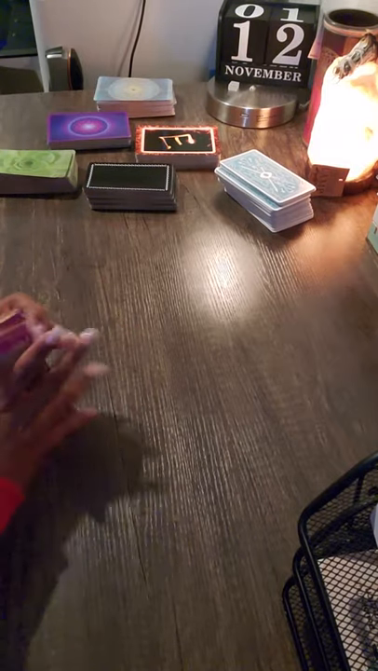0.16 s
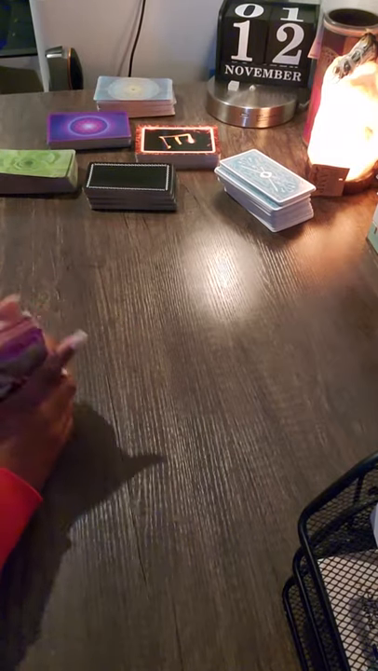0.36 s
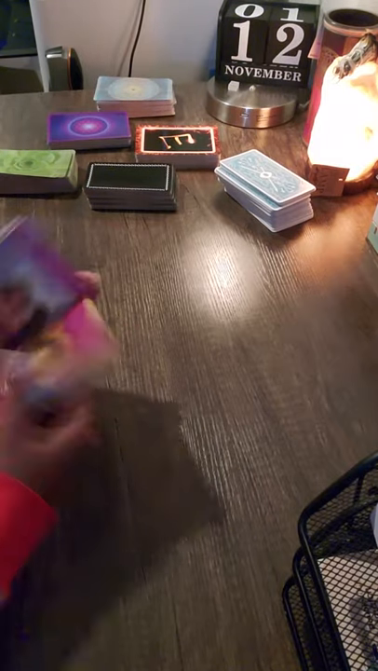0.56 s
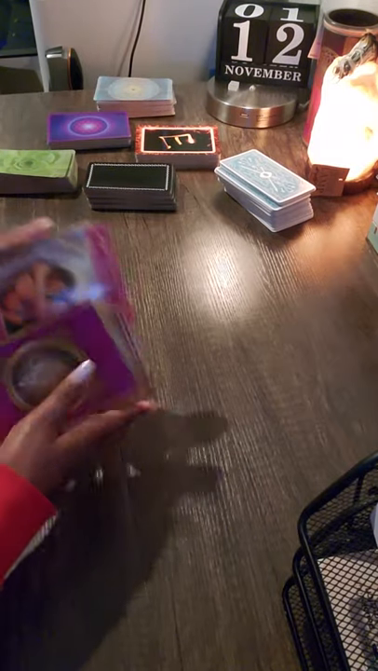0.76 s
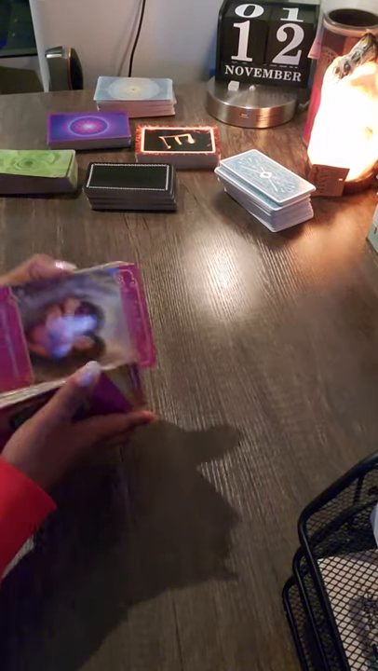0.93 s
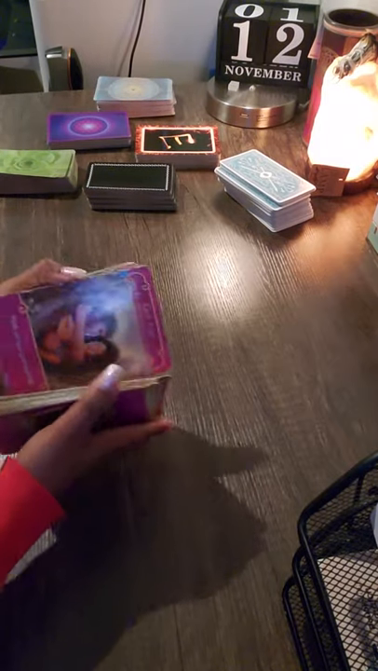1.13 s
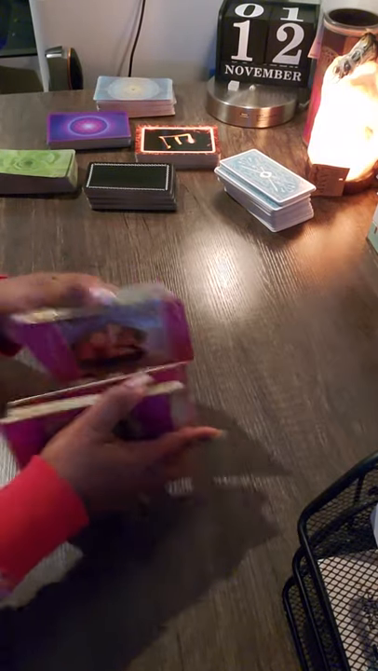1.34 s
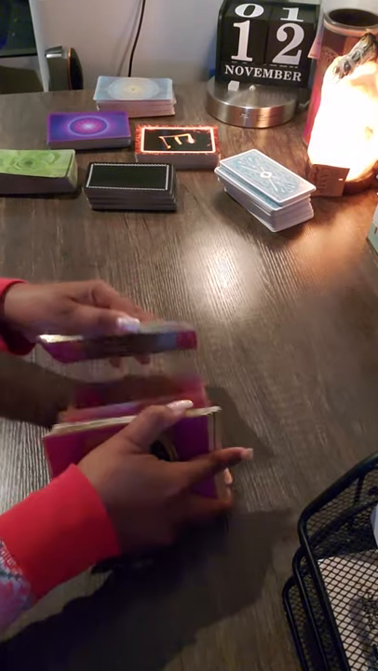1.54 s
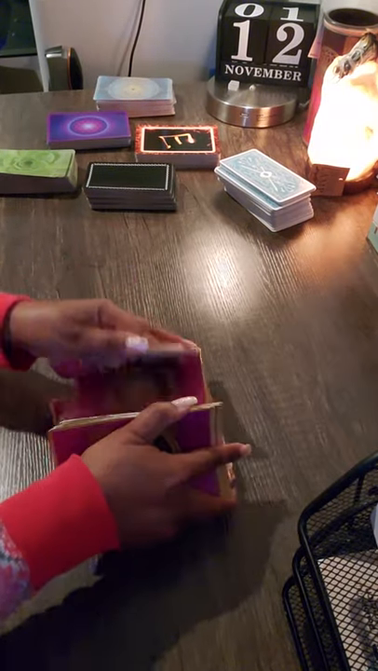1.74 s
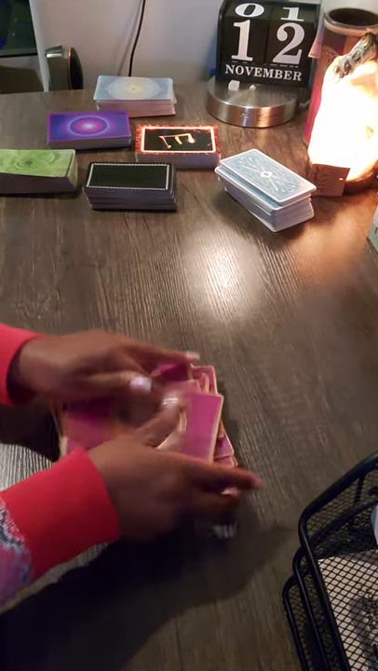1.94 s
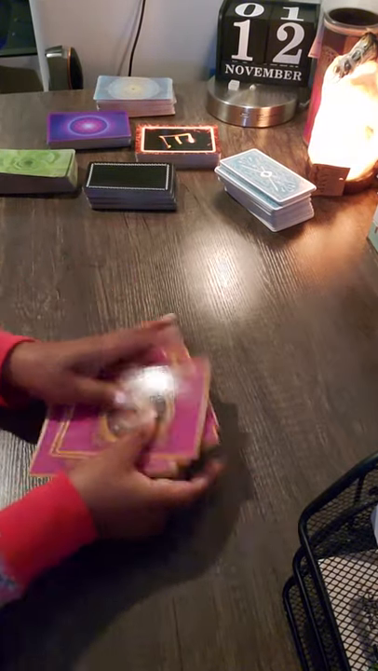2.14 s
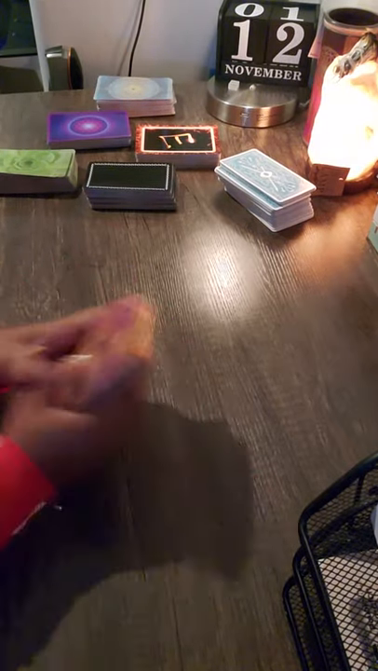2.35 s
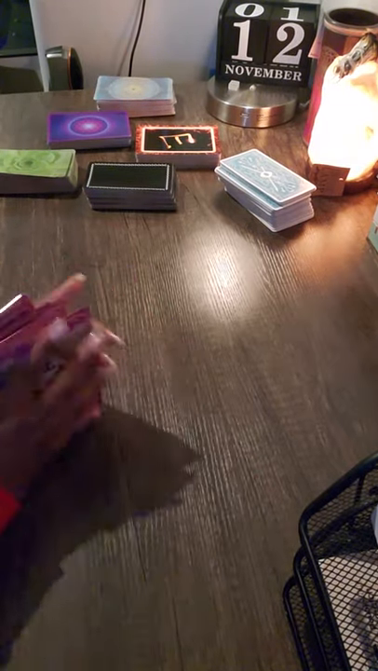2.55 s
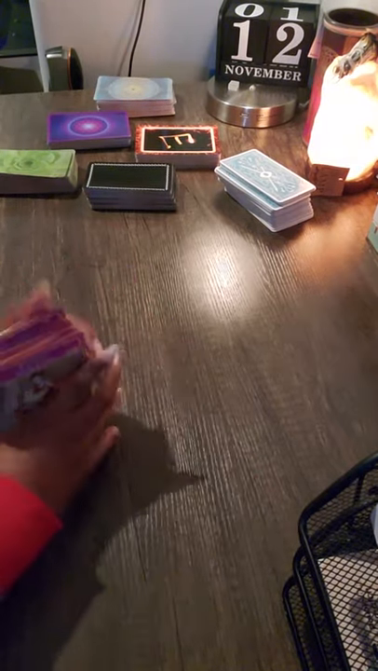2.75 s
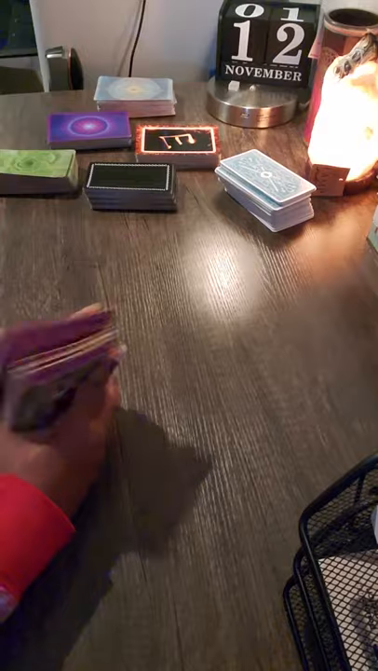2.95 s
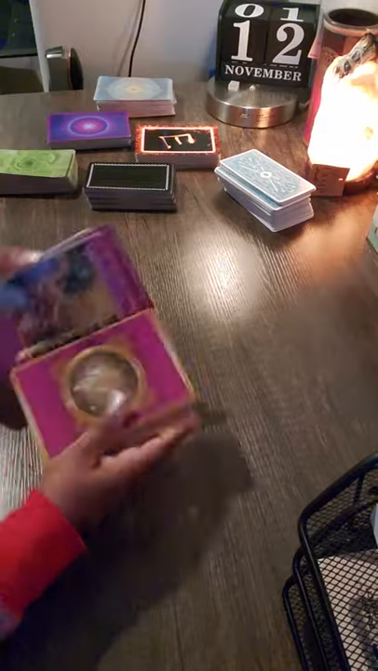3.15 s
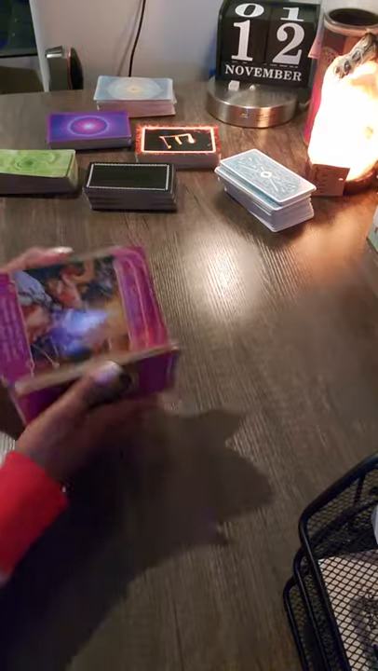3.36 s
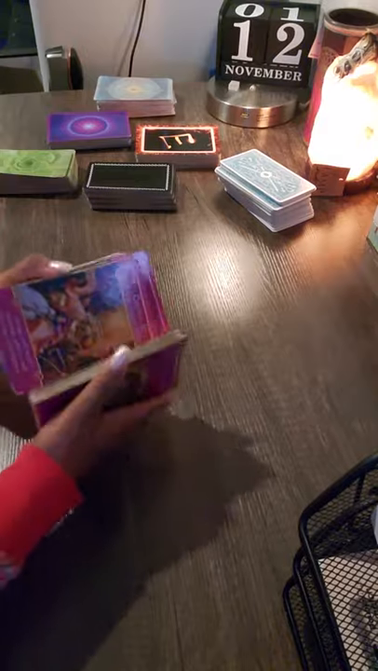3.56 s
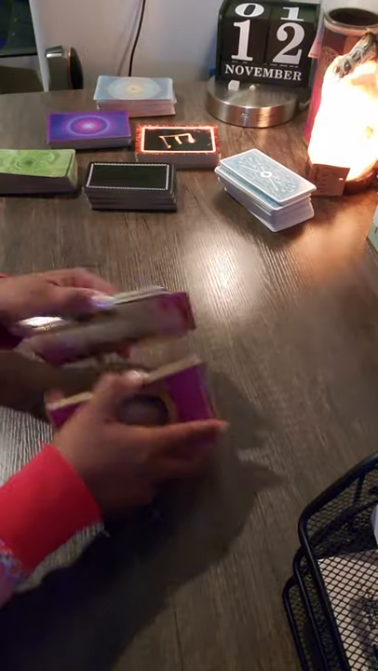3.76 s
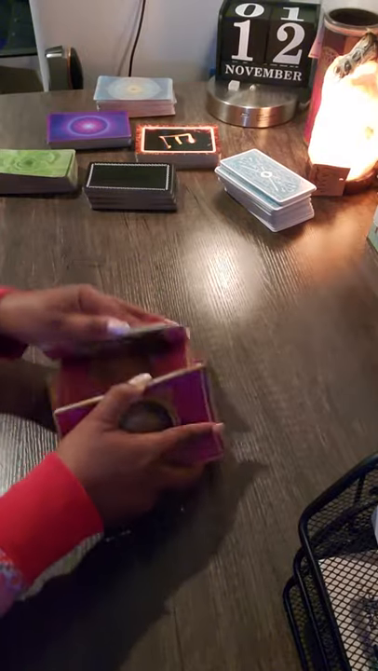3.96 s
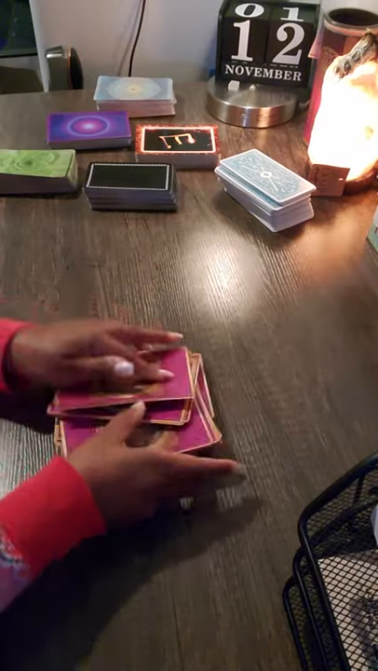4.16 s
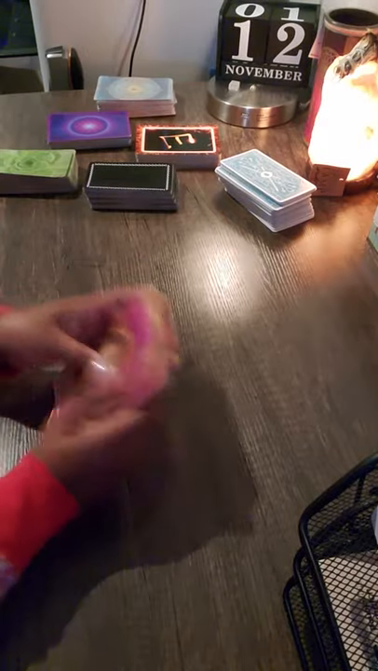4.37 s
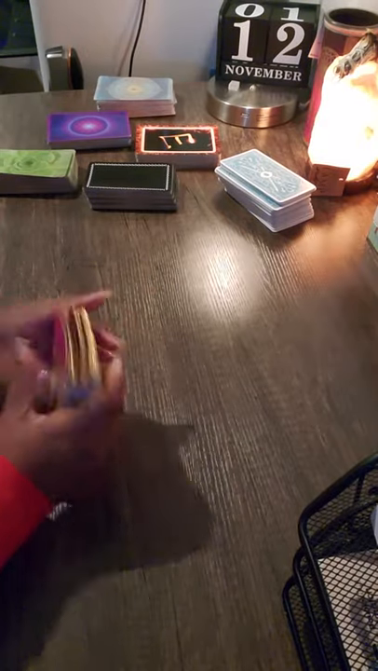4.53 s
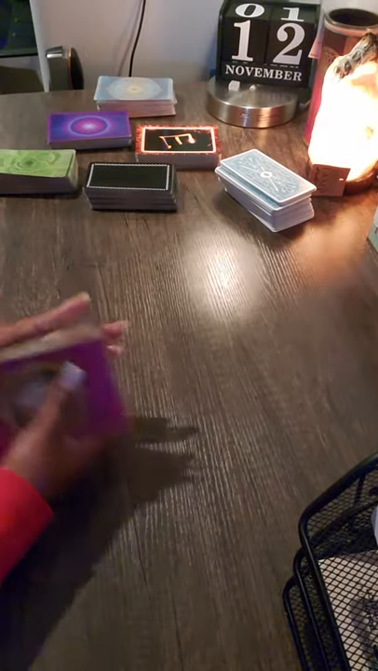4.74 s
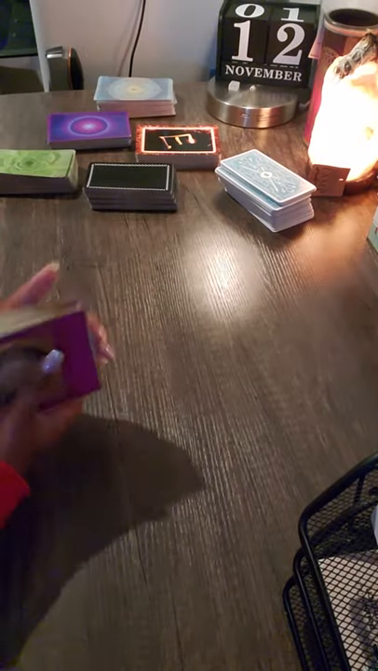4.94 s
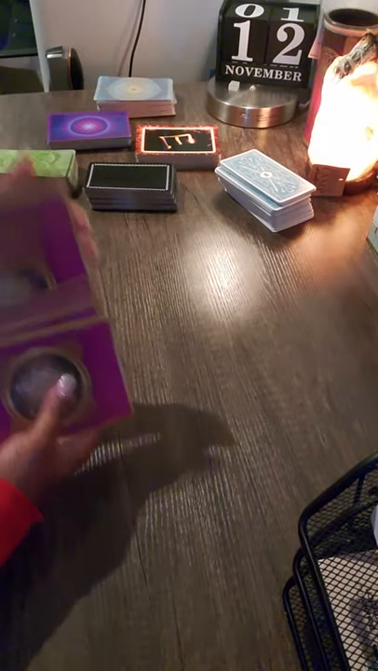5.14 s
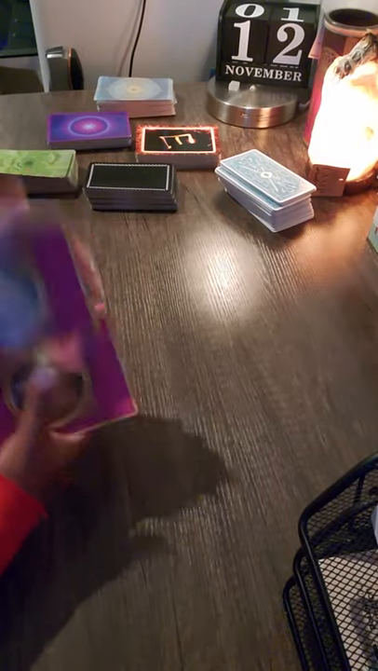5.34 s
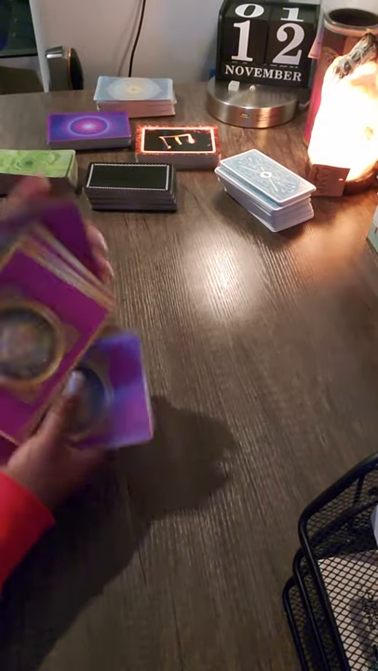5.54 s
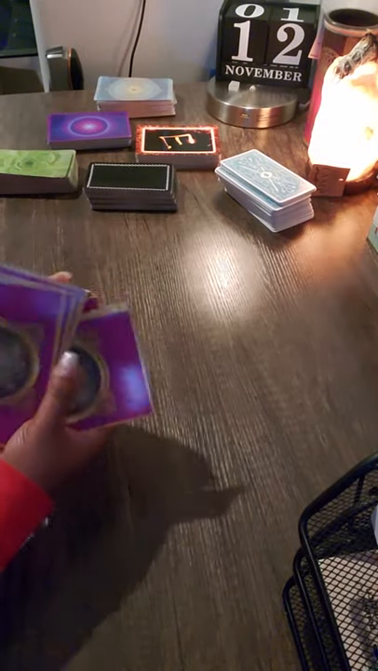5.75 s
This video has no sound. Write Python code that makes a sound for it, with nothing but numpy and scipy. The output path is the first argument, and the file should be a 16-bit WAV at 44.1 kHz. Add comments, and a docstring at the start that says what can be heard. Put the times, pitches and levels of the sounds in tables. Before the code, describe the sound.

Hands shuffle thick cards in a quiet room: dense papery slaps and low table knocks come in clusters, separated by soft flicks and lulls.

```python
"""Hands shuffle a deck of large stiff cards over a wooden table in a quiet furnished room; two close phone mics.
0-0.8 s: quick slaps, sliding, then light flicks; a lull of low rumble, hum and faint hiss (filtered noise, sine).
1.5-2.9 s: dense slaps (noise bursts through deck resonances), table thuds (dying sines), card rub (gated noise).
2.9-3.8 s: soft flicks and a brief rasp (slips through a gliding resonance); 3.9-4.7 s: slaps and thuds again.
4.7-5.8 s: faint rasps, then sliding, louder rasps and the last hard slaps."""
import sys
import numpy as np
from scipy import signal
from scipy.io import wavfile
from scipy.ndimage import uniform_filter1d

SR = 44100
rng = np.random.default_rng(int(sys.argv[2]) if len(sys.argv) > 2 else 0)


def attenuation_scalar(level_db):
    """Turn a level in dB into a linear amplitude multiplier (20 dB per decade)."""
    decades = np.asarray(level_db, float) / 20
    return 10 ** decades


def int16_out(signal):
    """Quantize to a 16-bit WAV file."""
    q = np.round(np.clip(np.atleast_2d(signal).T, -1, 1) * 32767)
    wavfile.write(sys.argv[1], SR, q.astype(np.int16))


N = 255780


def evened(x):
    """Scales to unit rms."""
    return x / np.sqrt(np.mean(x ** 2) + 1e-20)


def read(points, hz):
    """Interpolates a table over log frequency."""
    f, value = np.transpose(points)
    return np.interp(np.log(hz + 1), np.log(f + 1), value)


def add(mix, s, sound):
    """Adds a sound into the mix at s seconds, cut at the end."""
    part = mix[..., max(round(s * SR), 0):][..., :sound.shape[-1]]
    part += sound[..., :part.shape[-1]]


def band(x, lo_hz, hi_hz, order=2):
    edges = np.clip([lo_hz, hi_hz], 10, SR / 2 - 500)
    return signal.sosfilt(signal.butter(order, edges, "bandpass", fs=SR, output="sos"), x)


def ring(modes, t, detune):
    """Sum of dying sines; detune shifts each mode's pitch and strength."""
    hz, db, t60_s = np.transpose(modes)[:, :, None]
    shake = detune[:len(hz), None]
    level = attenuation_scalar(db + 4 * shake - 60 * t / t60_s)
    pitch_hz = hz * (1 + 0.06 * shake[::-1])
    return (level * np.sin(2 * np.pi * pitch_hz * t)).sum(0)


# left-right likeness of noise and echo: f/Hz, likeness/1
SAME = [(60, 0.75), (300, 0.85), (1000, 0.14), (3000, 0.2), (7000, 0.0059)]


def pair(size):
    """Spectra of white noise at two mics: alike in the bass, nearly unrelated in the treble."""
    hz = np.fft.rfftfreq(size, 1 / SR)
    a, b, c, d = rng.standard_normal((4 * N // size + 5, len(hz), 4)).T
    same = np.clip(read(SAME, hz), -1, 1)[:, None]
    left = a + 1j * b
    right = same * left + np.sqrt(1 - same ** 2) * (c + 1j * d)
    return hz, np.array([left, right])


def unfold(z, size):
    """Spectra to waveforms of unit rms."""
    return evened(signal.istft(z, nperseg=size, noverlap=3 * size // 4)[1][:, :N])


# hiss spectrum: f/Hz, relative density/dB per Hz
QUIET = [(25, -3.5), (70, -6.5), (100, -10), (242, -26), (1250, -34.5), (11600, -38.5), (16000, -35.5)]
QUIET_RMS_DB = -70.5
# low rumble: t/s, rms level/dB
RUMBLE = [(0, -57.5), (0.901, -75.5), (1.13, -68), (1.4, -75.5), (3.28, -63), (3.5, -76.5), (4.449, -59),
          (5.8, -78)]
HUM_HZ, HUM_PEAK_DB = 120, -76


def room_tone():
    """Steady shaped-noise hiss, narrow-band rumble of wavering level, household hum as a steady sine."""
    t = np.arange(N) / SR
    hz, z = pair(size=2048)
    hiss = attenuation_scalar(QUIET_RMS_DB) * unfold(z * attenuation_scalar(read(QUIET, hz))[:, None], size=2048)
    s, db = np.transpose(RUMBLE)
    hum = attenuation_scalar(HUM_PEAK_DB) * np.sin(2 * np.pi * HUM_HZ * t)
    low = rng.standard_normal(N) + 0.22 * rng.standard_normal((2, N))  # mostly common to both mics
    rumble = attenuation_scalar(np.interp(t, s, db)) * evened(band(low, 66, 80))
    return hiss + rumble + hum


# room decay: f/Hz, t60/s
ROOM = [(150, 0.21), (500, 0.16), (1500, 0.18), (4000, 0.23), (8000, 0.16), (15000, 0.038)]


def room(x):
    """Echo: sparse taps of random sign, each band dying at its own speed."""
    length = SR // 2
    slots = np.arange(120, length - 20, 20)
    taps = np.zeros((2, length))
    at = slots + rng.integers(0, 20, (2, len(slots)))
    np.put_along_axis(taps, at, rng.choice([-1., 1.], at.shape), 1)
    hz, t, z = signal.stft(taps, SR, nperseg=512)
    same = np.clip(read(SAME, hz), -1, 1)[:, None]
    z[1] = same * z[0] + np.sqrt(1 - same ** 2) * z[1]  # close mics share the bass
    decay = attenuation_scalar(-60 * t / read(ROOM, hz)[:, None])
    tail = signal.istft(z * decay, SR, nperseg=512)[1]
    tail *= 1 - np.exp(-np.arange(tail.shape[1]) / SR / 0.00029)  # echoes build up as the walls answer
    return signal.fftconvolve(x[None], tail / np.linalg.norm(tail[0]), axes=1)[:, :N]


# table-top modes, damped by the hands, nominal: f/Hz, level/dB, t60/s
TABLE = [(82, -9, .04), (120, 0, .065), (190, -11, .022)]
# hands and deck knocking the table: t/s, nominal peak level/dB, mode pitch at that spot/ratio
THUDS = [(0.034, -36.5, 0.75), (0.201, -38.5, 1.14), (0.302, -34, 1.03), (1.545, -36.5, 1),
         (1.623, -28.5, 0.75), (1.701, -36.5, 1.18), (1.718, -29.5, 0.99), (1.796, -33, 0.69),
         (1.914, -35, 0.97), (2.556, -33, 0.92), (2.595, -28, 1.18), (3.885, -26, 1.05), (3.983, -28, 1.01),
         (4.031, -24, 1.15), (4.116, -33, 0.91), (4.143, -38, 1.3), (4.58, -39, 1.11), (4.609, -26, 0.94),
         (5.69, -30, 1.08)]
THUD_SIDE_DB = 0.7  # scale of left-right scatter


def knocks():
    """Table-top modes swell over a few ms and die."""
    t, out = np.arange(round(.12 * SR)) / SR, np.zeros((2, N))
    detunes = rng.standard_normal((len(THUDS), len(TABLE)))
    for (s, db, ratio), detune in zip(THUDS, detunes):
        modes = np.multiply(TABLE, [ratio, 1, 1])
        thud = ring(modes, t, detune / 2) * (1 - np.exp(-t / 0.01))
        side_db = THUD_SIDE_DB * detune[-1] * np.array([[1], [-1]])  # each lands nearer one mic
        add(out, s, attenuation_scalar(db + side_db) * thud / abs(thud).max())
    return out


# edge dragged over a card: start t/s, end t/s, start f/Hz, end f/Hz, level before fades/dB
RASPS = [(.4, .52, 480, 360, -61), (.535, .658, 1650, 1450, -58), (3.05, 3.17, 1580, 1650, -62),
         (4.78, 5.06, 4800, 4700, -69), (5.212, 5.245, 5900, 5100, -62), (5.236, 5.329, 2280, 2500, -69),
         (5.408, 5.48, 1650, 1900, -37), (5.46, 5.585, 2050, 1750, -48)]
RASP_WIDEST_HZ = 750


def rasp():
    """A dragged edge catches in quick random slips, sounding the gap between cards as a gliding resonance."""
    out = np.zeros(N)
    for start, end, from_hz, to_hz, db in RASPS:
        t = np.arange(round((end - start) * SR)) / SR
        slips = rng.standard_normal(len(t)) * (rng.random(len(t)) < .5 * from_hz / SR)
        glide_hz = np.linspace(from_hz, to_hz, len(t))
        turn = np.exp(2j * np.pi * np.cumsum(glide_hz) / SR)
        r = np.exp(-np.pi * min(.3 * from_hz, RASP_WIDEST_HZ) / SR)  # width grows with the start pitch
        # shift down to 0 Hz, smooth twice, shift back
        once = signal.lfilter([1 - r], [1, -r], slips / turn)
        gap = (turn * signal.lfilter([1 - r], [1, -r], once)).real
        add(out, start, attenuation_scalar(db) * evened(gap) * signal.windows.tukey(len(t), .3))
    return out


# sliding strokes, and rattling or echoing tails of slaps:
# start t/s, hold/s, rub level/dB, flexing body level/dB, glossy hiss level/dB
STROKES = [(0, 0.095, -60.5, -56, -58), (0.138, 0.09, -71.5, -52.5, -65.5),
           (0.194, 0.029, -69.5, -49.5, -70.5), (0.292, 0.075, -57.5, -48, -78.5),
           (0.583, .045, -50.5, -64, -47), (0.628, 0.049, -50.5, -74.5, -58),
           (0.751, 0.12, -76, -81, -72.5), (1.62, 0.03, -40, -37.5, -43), (1.72, 0.0381, -69, -57.5, -46),
           (1.778, 0.026, -34.5, -34, -37.5), (1.883, 0.015, -32, -36, -39.5),
           (1.909, 0.037, -36, -27, -35.5), (1.563, .03, -53, -53.5, -52.5),
           (2.091, 0.027, -47.5, -58.5, -72), (2.297, 0.034, -38.5, -60.5, -42.5),
           (2.37, 0.11, -49.5, -56.5, -52.5), (2.566, 0.026, -60.5, -30, -64),
           (2.633, .05, -77, -40.5, -86), (2.753, 0.077, -87.5, -58, -92.5),
           (2.993, 0.19, -61, -74.5, -61.5), (3.266, 0.06, -64, -76.5, -63),
           (3.933, 0.15, -50.5, -46.5, -50.5), (4.116, 0.046, -31.5, -32.5, -32.5),
           (4.2, 0.047, -48, -47, -61), (4.287, 0.063, -55.5, -64.5, -72), (4.402, 0.11, -56.5, -71, -67),
           (4.594, 0.028, -38.5, -34.5, -42), (4.654, 0.033, -47, -44.5, -48.5),
           (5.124, 0.039, -66.5, -68.5, -70), (5.385, 0.03, -40.5, -36.5, -45),
           (5.454, .11, -47.5, -53, -52), (5.641, .12, -50.5, -60, -54)]
RISE_DB_PER_S, FALL_DB_PER_S = 899, 351
FIDGET_DB = -87  # cards never lie quite still in the hands


def strokes():
    """Gains of rub, body and gloss: each stroke or tail rises fast, holds and falls slower; powers add."""
    t = np.arange(0, N + 64, 64) / SR
    start, hold, *levels_db = np.transpose(STROKES)[:, :, None]
    rise_db = -RISE_DB_PER_S * np.maximum(start - t, 0)
    fall_db = -FALL_DB_PER_S * np.maximum(t - start - hold, 0)
    gains = []
    for db in levels_db:
        power = (attenuation_scalar(db + rise_db + fall_db) ** 2).sum(0)
        gains.append(np.sqrt(power + attenuation_scalar(FIDGET_DB) ** 2))
    return [np.interp(np.arange(N) / SR, t, gain) for gain in gains]


# deck modes, nominal, rung by slides and slaps: f/Hz, level/dB, t60/s
DECK = [(618.8, -4.5, 0.04), (1066, -3.5, 0.01), (1920, 10, 0.0032), (3100, 1, 0.011)]
GRIP_DB = 2.8  # rms unevenness of grip


def slide():
    """Glossy faces rub with uneven grip (patchy noise); loose edges tick when the cards move hard."""
    rub, weight, gloss = strokes()
    hz, z = pair(size=256)
    patches = uniform_filter1d(rng.standard_normal(z.shape[1:]), size=5, axis=0)
    patches = evened(uniform_filter1d(patches, size=14, axis=1))
    grip = evened(uniform_filter1d(rng.standard_normal(z.shape[2]), size=6))
    hiss = unfold(z * attenuation_scalar(2.7 * patches + GRIP_DB * grip), size=256)
    # about 150 ticks per s, t60 9 ms
    ticks = attenuation_scalar(4.5 * np.minimum(rng.exponential(1, N), 3)) * (rng.random(N) < 150 / SR)
    ticks = signal.oaconvolve(ticks, attenuation_scalar(-60 * np.arange(900) / SR / 0.009))[:N]
    hard = weight / (weight + attenuation_scalar(-48))  # ticking grows as cards flex; light swishes stay smooth
    drive = hiss * (1 + 0.9 * hard * (evened(ticks) - .7))
    low = band(drive, 160, 1600)
    deck = ring(DECK, np.arange(2048) / SR, np.zeros(len(DECK)))[None]
    flex = signal.oaconvolve(low, deck, axes=1)[:, :N]
    rub_sound = rub * evened(band(drive, 2800, 7800))
    body_sound = weight * evened(evened(low) + 0.045 * evened(flex))
    gloss_sound = gloss * evened(band(drive, 8300, 24000, order=3))
    return rub_sound + body_sound + gloss_sound


def body(push, hz, top_hz, deck, heavy):
    """Broad push, lifted at the hollow's pitch, plus brief deck ring; light flicks sound mostly the hollow."""
    rung = band(signal.fftconvolve(push, deck, axes=1)[:, :push.shape[1]], 300, SR)
    wide = band(push, 250, top_hz, order=6)
    spread = 1.1 + .12 * heavy
    hollow = band(push, hz / spread, hz * spread)
    wide_part = (0.2 + 1.6 * heavy) * evened(wide)
    hollow_part = (1.3 - 0.45 * heavy) * evened(hollow)
    return evened(wide_part + hollow_part + 2.2 * heavy ** 2 * evened(rung))


# slaps: t/s, peak level of body/dB, f of hollow between cards/Hz, edge crack peak re body/dB
SLAPS = [(0.029, -40.5, 584, -53.5), (0.089, -46.5, 2550, 27), (0.111, -29, 990, -46.5),
         (0.122, -29.5, 614, -48), (0.191, -23, 595, -42), (0.229, -20, 1370, -50.5),
         (0.24, -9.5, 3020, -14), (0.308, -25, 630, -34.5), (0.627, -38, 1910, 15), (0.66, -32, 4080, -12),
         (0.684, -46, 660, -14), (0.693, -31.5, 3000, -3.5), (0.718, -36.5, 2900, -7),
         (0.973, -57, 1727, 3), (1.033, -66, 1900, -23), (1.516, -35.5, 1995, -10.5),
         (1.555, -12.5, 740, 2.5), (1.628, -10, 1500, -6), (1.697, -6.5, 1730, -20),
         (1.703, 0.5, 1570, 1.5), (1.733, -21, 2197, -13), (1.777, -20, 970, -20), (1.794, -14.5, 1760, -9),
         (1.806, -12.5, 940, -6), (1.825, -17.5, 600, -6), (1.869, -15, 4330, -0.5),
         (1.884, -13.5, 482, -12), (1.918, -15.5, 1970, -38), (1.928, -20.5, 934, -15.5),
         (1.942, -10.5, 1860, -8.5), (1.951, -12, 910, 1.5), (2.017, -26, 463, -1.5),
         (2.094, -33.5, 3250, -0.5), (2.162, -29.5, 3070, -5), (2.191, -38.5, 1110, -30),
         (2.412, -34.5, 1060, 3.5), (2.459, -25.5, 2590, 2.5), (2.469, -36.5, 496, -35),
         (2.558, -6.5, 770, -17.5), (2.642, -24.5, 1550, -42), (2.66, -15.5, 2190, -35.5),
         (2.759, -41, 700, -45), (2.859, -23, 903, -46.5), (2.865, -16.5, 1280, -35.5),
         (3.104, -39.5, 1630, -23.5), (3.144, -41.5, 1700, 3), (3.171, -42, 2880, -6.5),
         (3.208, -34, 2650, -7), (3.265, -45.5, 2070, -31), (3.447, -38.5, 2200, -14.5),
         (3.854, -36.5, 2110, -13), (3.887, -12.5, 3100, -1), (3.995, -19, 1580, -3),
         (4.013, -21, 1760, -23.5), (4.03, -18, 1630, -4), (4.048, -21, 1090, -34), (4.09, -19, 950, -41),
         (4.119, -9, 630, -8.5), (4.139, -6, 680, -5), (4.157, -22.5, 1970, -20.5),
         (4.176, -11.5, 2000, -7.5), (4.207, -31, 3950, 5), (4.223, -27.5, 5450, -1),
         (4.283, -33, 4500, -8), (4.351, -35.5, 4400, -7), (4.356, -32.5, 3480, -18),
         (4.369, -37, 2520, -10.5), (4.533, -34, 1000, -13), (4.585, -16, 564, -10),
         (4.606, -16.5, 1830, -5.5), (4.611, -13.5, 570, -30.5), (5.126, -54, 614, -3),
         (5.152, -58.5, 703, -12), (5.298, -35, 1890, -9.5), (5.362, -32.5, 534, -5),
         (5.371, -25.5, 1860, -5), (5.383, -25.5, 485, -28), (5.406, -18, 1520, -14),
         (5.411, -3.5, 1550, -5.5), (5.628, -29.5, 600, -39.5), (5.673, -12.5, 586, -39),
         (5.69, -3.5, 2840, -15.5), (5.705, -0.5, 1390, -5.5)]
SWELL_S, SWELL_DB = .003, -27.5  # a faint swell of a few ms leads into each slap
LOWEST_TOP_HZ = 3650  # lowest upper edge of the broad band
FLICK_DB = -32  # below this a slap moves only a card or two
# slaps that face away from the phone are duller and roomier
ECHO_DB, ECHO_PER_CRACK_DB = -8, -0.1468


def slaps():
    """A ragged push drives the hollow between the cards; the deck rings and the edge cracks."""
    t = np.arange(round(.12 * SR)) / SR
    cards, into_room = np.zeros((2, N)), np.zeros(N)
    noises = rng.standard_normal((len(SLAPS), 4, len(t)))
    detunes = rng.standard_normal((len(SLAPS), len(DECK)))
    pulse = signal.unit_impulse(len(t))[None]
    treble_pulse = evened(band(pulse, 2200, 25000))
    swell_db = SWELL_DB * (1 - t / SWELL_S)
    for (s, db, hz, crack_db), noise, detune in zip(SLAPS, noises, detunes):
        top_hz = max(5000 * attenuation_scalar(0.17 * (crack_db + 28.0)), LOWEST_TOP_HZ)  # weak crack: less treble
        deck = ring(DECK, t, detune)[None]
        heavy = 1 / (1 + attenuation_scalar(FLICK_DB - db))  # share of the deck set moving
        spikes = noise[3] ** 2  # card by card
        fall_db = -60 * (t - SWELL_S) / (0.008 + 0.014 * heavy)
        landing = attenuation_scalar(np.minimum(swell_db, fall_db)) * spikes
        side = 0.76 * band(noise[1] * landing, 1600, SR) * np.array([[1], [-1]])  # mics differ in treble
        slap = body(noise[0] * landing + side, hz, top_hz, deck, heavy)
        snap = attenuation_scalar(np.minimum(swell_db, -60 * (t - SWELL_S) / 0.0092))
        edge = band(noise[1:3] * spikes * snap, 6400, 16000)
        strength = attenuation_scalar(db) / abs(slap).max()
        crack = attenuation_scalar(db + crack_db) / abs(edge).max()
        add(cards, s - SWELL_S, strength * slap + crack * edge)
        # the room hears the same energy as one smooth pulse
        bright = treble_pulse * crack * edge.std()
        smooth = strength * body(pulse, hz, top_hz, deck, heavy) + bright
        echo_db = ECHO_DB - 5 * (1 - heavy) + ECHO_PER_CRACK_DB * crack_db
        add(into_room, s, attenuation_scalar(echo_db) * smooth[0])
    return cards, into_room


SPACING_S = .00005  # extra travel time to the right mic, rounded to whole samples


def scene():
    """Sums slaps, thuds and rubbing near the mics, their room echo and the room tone."""
    cards, into_room = slaps()
    rubbing = slide() + rasp()
    near = np.array([cards[0], np.roll(cards[1], round(SPACING_S * SR))])
    thuds = band(knocks(), 49, 740, order=3)  # small mics miss the deepest bass
    echo = room(into_room + (attenuation_scalar(-5.5) * rubbing + attenuation_scalar(-11.0) * thuds).mean(0))
    return near + thuds + rubbing + echo + room_tone()


def top_cut(x):
    """Nothing passes above the cut-off."""
    return signal.sosfilt(signal.butter(12, 17000, fs=SR, output="sos"), x)


def record(dry):
    """Soft overload by tanh, then a linear-phase low-pass."""
    lowpass = signal.firwin(255, 15900, fs=SR)[None]  # edge in Hz
    mix = signal.oaconvolve(np.tanh(dry), lowpass, "same")
    return top_cut(mix)


dry = scene()
out = record(dry)
int16_out(out)
```